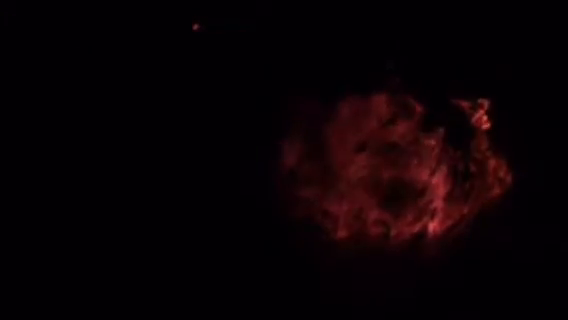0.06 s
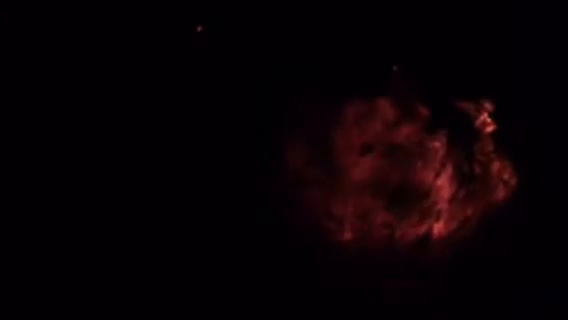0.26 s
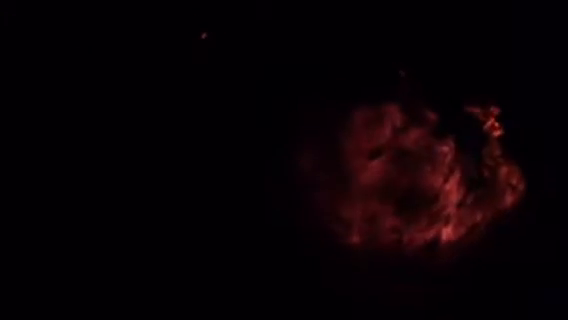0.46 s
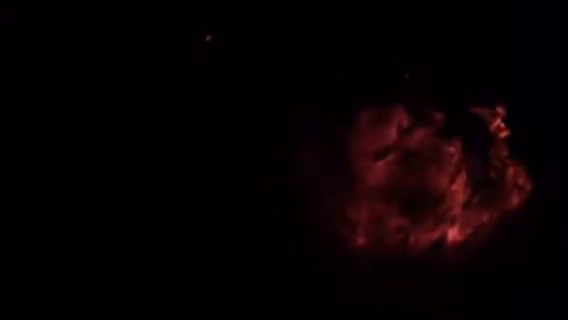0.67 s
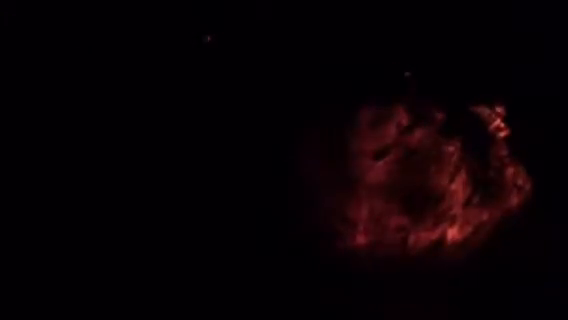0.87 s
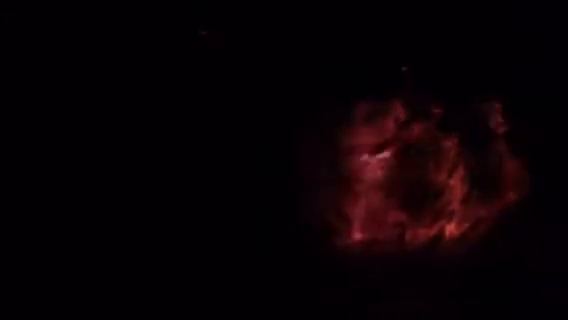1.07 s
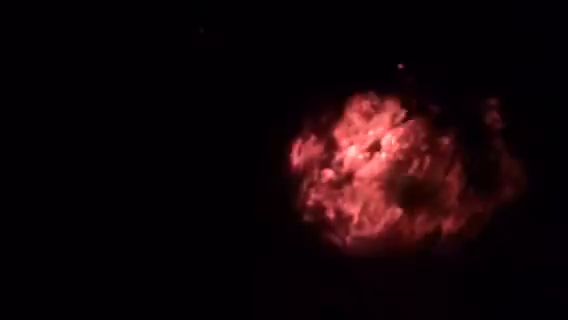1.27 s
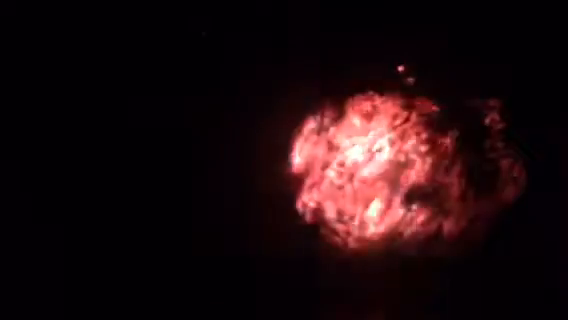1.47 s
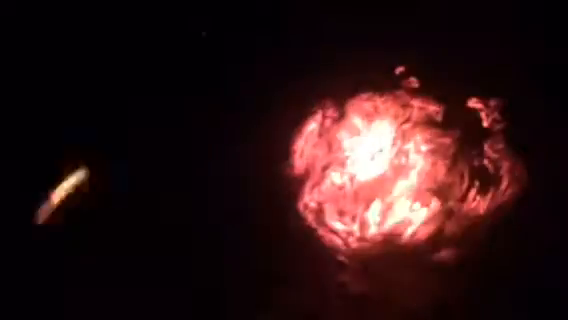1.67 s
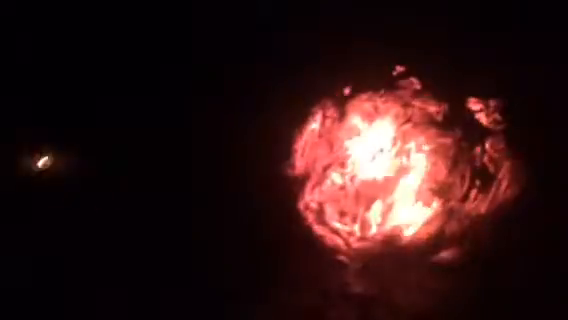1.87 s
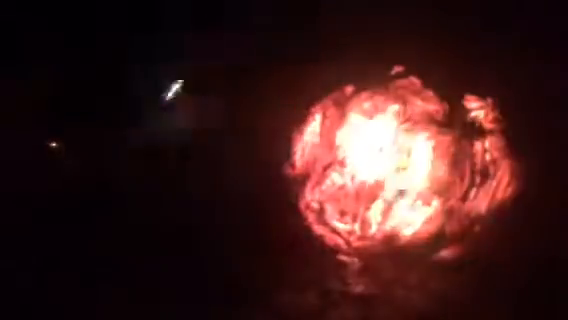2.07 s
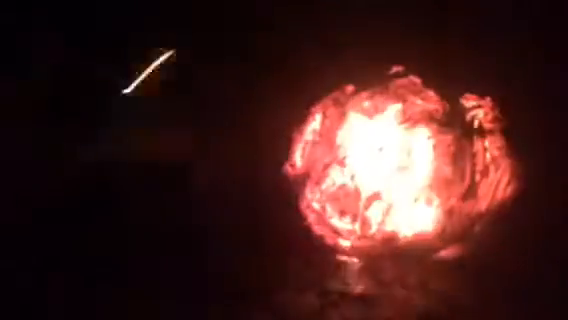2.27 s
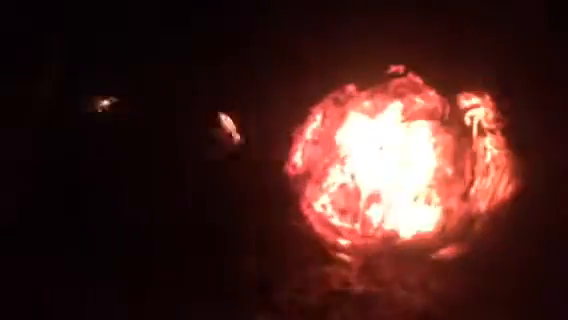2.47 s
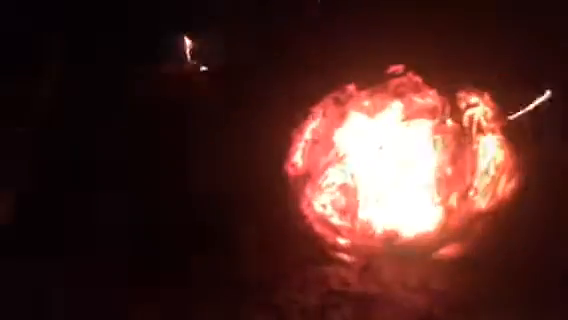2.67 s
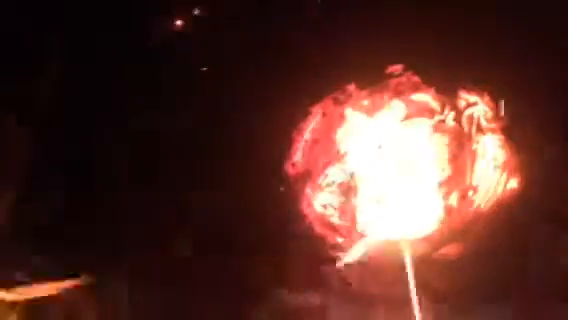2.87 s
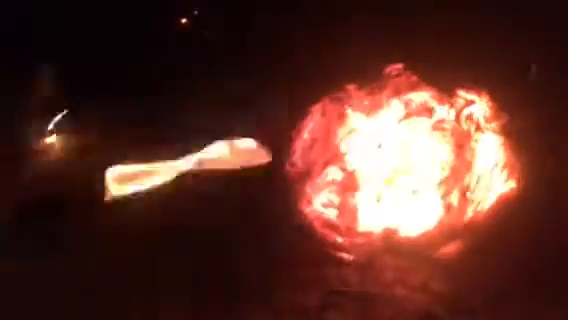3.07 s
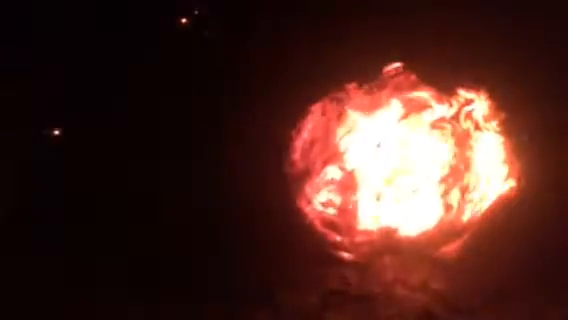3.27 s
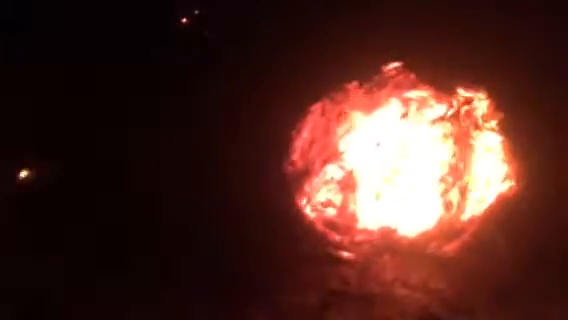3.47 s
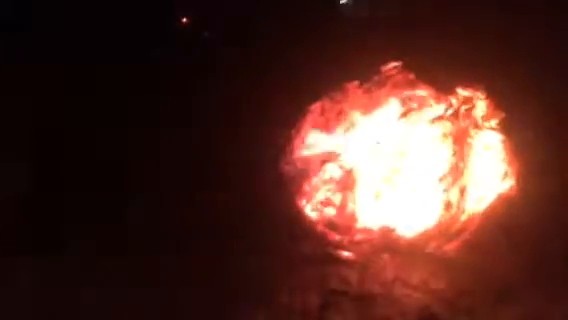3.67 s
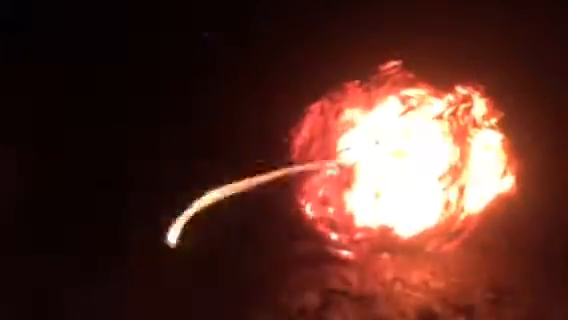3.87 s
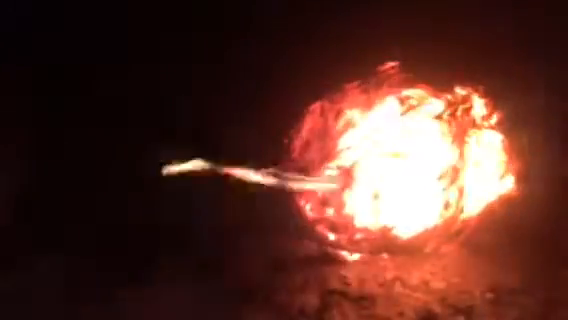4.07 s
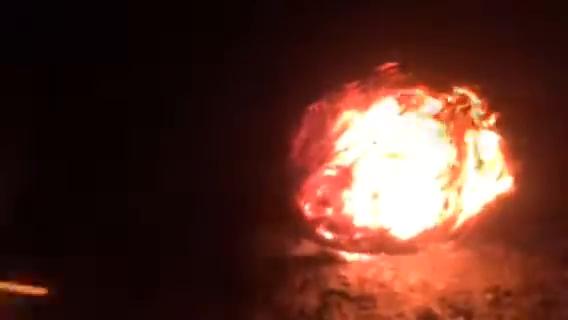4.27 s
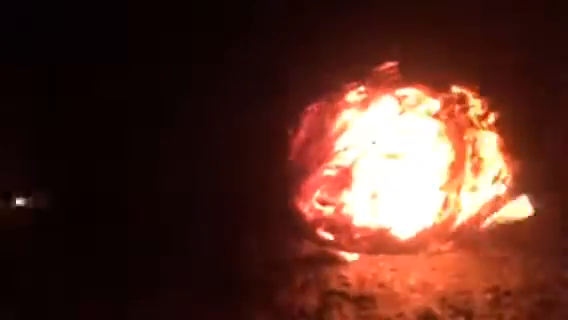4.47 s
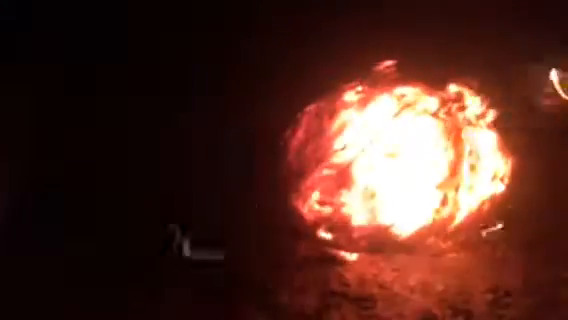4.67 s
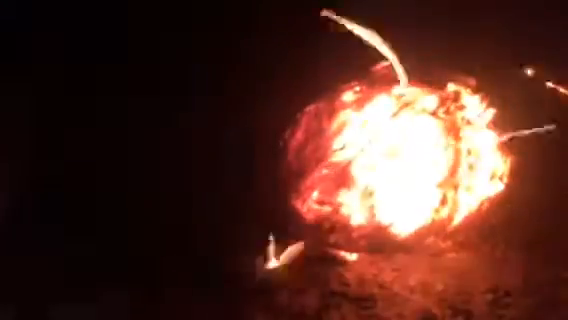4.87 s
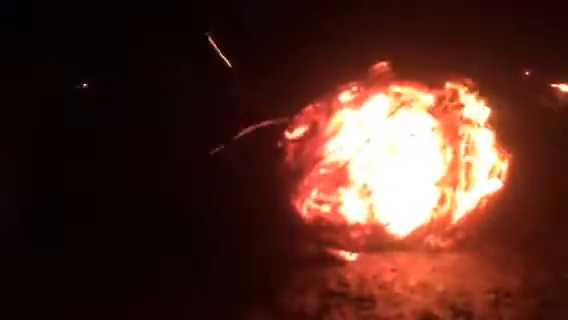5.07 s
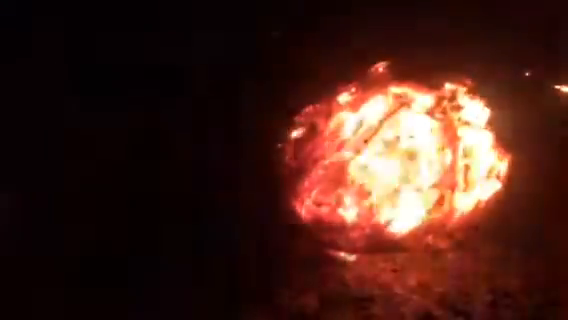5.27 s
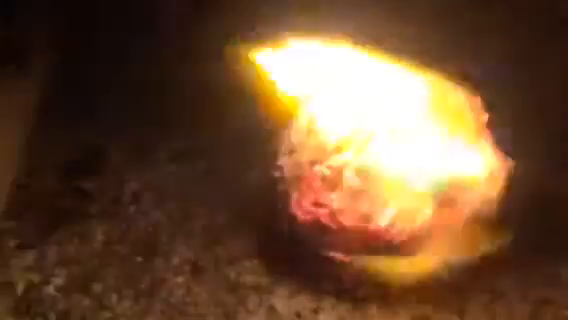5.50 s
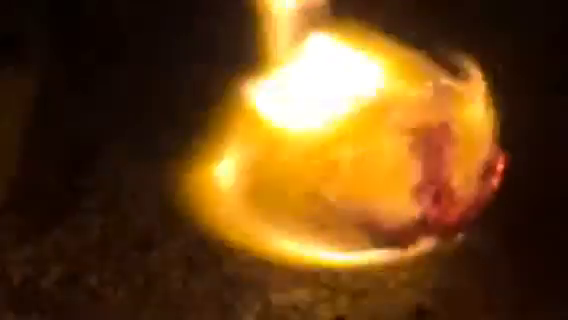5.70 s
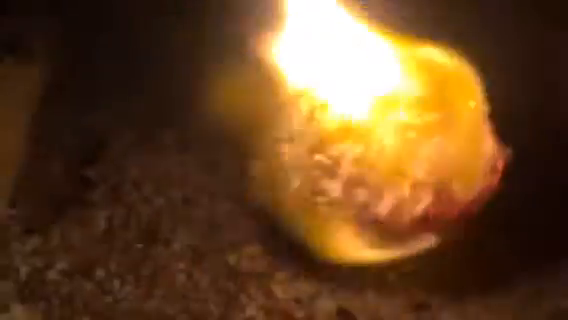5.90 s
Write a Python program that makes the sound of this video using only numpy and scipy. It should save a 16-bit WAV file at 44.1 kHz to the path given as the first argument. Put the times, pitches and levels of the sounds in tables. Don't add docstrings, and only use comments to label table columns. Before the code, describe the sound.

Wind bumps against a nearby microphone throughout, deep and uneven. Crumpled paper smoulders with faint high ticks and pings for just over a second, then burns up in a gusty, breathy rush, with papery crackling and low flame flaps growing denser. After five seconds it collapses to quiet, with bright tiny crackles and fizz. Open air, no echo.

```python
import sys
import numpy as np
from scipy import signal
from scipy.fft import rfft, irfft, next_fast_len
from scipy.io import wavfile
from scipy.ndimage import uniform_filter1d

SR = 44100
rng = np.random.default_rng(int(sys.argv[2]) if len(sys.argv) > 2 else 0)


def materialize(psi):
    bounded = np.clip(np.atleast_2d(psi).T, -1, 1)
    quanta = np.round(bounded * 32767).astype(np.int16)
    wavfile.write(sys.argv[1], SR, quanta)


def to_linear_factor(level_db):
    exponent = np.asarray(level_db, float) / 20
    return 10 ** exponent


N = 261954

# (crest time [s], peak level [dB], frequency [Hz])
EDDIES = [(0.079, -27, 121), (0.131, -23.5, 89), (0.191, -25.5, 87.5), (0.374, -27, 92), (0.548, -21.5, 86),
          (0.73, -23, 90.0), (0.935, -23, 99), (1.006, -26.5, 126), (1.303, -26.5, 144.0), (1.413, -24, 83),
          (1.501, -23.5, 127.0), (1.571, -20.5, 88), (1.608, -19.5, 106), (1.903, -21, 117.0),
          (1.966, -26, 99.0), (2.01, -20.5, 79.5), (2.092, -28, 69), (2.129, -24.5, 68.0),
          (2.281, -20.5, 151), (2.328, -22, 112), (2.508, -20.2, 84.5), (2.585, -21.5, 135),
          (2.648, -19, 126.0), (2.691, -23, 88.6), (2.787, -19, 151), (2.918, -19, 158), (2.966, -22, 183),
          (3.087, -20, 198.0), (3.24, -25, 95), (3.321, -23, 103.0), (3.411, -21, 146.0), (3.456, -23, 150),
          (3.545, -17, 158), (3.727, -17.5, 145), (3.855, -18, 128), (3.929, -20, 170), (3.966, -19, 134),
          (4.016, -20.5, 116.0), (4.051, -28, 130), (4.132, -24, 122.0), (4.17, -17, 120),
          (4.429, -25, 117.0), (4.478, -19.5, 116.0), (4.554, -16, 179.0), (4.596, -23.5, 84),
          (4.708, -20, 74), (4.85, -19.5, 116), (4.88, -27, 99), (5.04, -16, 106), (5.206, -20, 130),
          (5.271, -22, 90.0), (5.305, -18, 85), (5.343, -23, 101), (5.414, -28, 65.0), (5.448, -23, 125),
          (5.607, -21, 105), (5.645, -21.5, 106.0), (5.751, -20, 88), (5.797, -19, 84), (5.932, -21, 106)]


def curves(table):
    s, *columns = np.transpose(table)
    return [np.interp(np.arange(N) / SR, s, column) for column in columns]


def level(x, db):
    return x * to_linear_factor(db) / np.sqrt(np.mean(x ** 2))


def walk(rate):
    hold = max(int(SR / rate), 1)
    held = np.repeat(rng.standard_normal(N // 100), hold)[:N]
    slewed = uniform_filter1d(uniform_filter1d(held, hold), hold)
    return level(slewed, 0)


def bands(source, colour):
    size = next_fast_len(N)
    octave = np.log2(np.arange(1, size // 2 + 2) * SR / size)
    hz, db = np.transpose(colour)
    shaped = rfft(source, size) * to_linear_factor(np.interp(octave, np.log2(hz), db, left=-99, right=-140))
    for centre in np.arange(4, 14.5, .5):
        window = np.cos(np.pi * np.clip(octave - centre, -.5, .5)) ** 2
        yield 2 ** centre, irfft(shaped * window, size)[:N]


def grains(per_s, spread_db):
    chance = rng.random((N, 2))
    size = to_linear_factor(-spread_db * np.log(1 - chance[:, 1]))
    sign = np.sign(rng.standard_normal(N))
    return level((chance[:, 0] < per_s / SR) * size * sign, 0)


def wind():
    # (time [s], rumble level [dB])
    gusts = [(0, -39.5), (.25, -36.5), (.75, -38.5), (1.2, -41), (1.5, -37.5), (2, -34), (2.7, -34.5),
             (2.85, -33), (3, -36), (3.2, -36.5), (3.5, -32), (3.8, -36), (4.4, -31), (4.75, -34),
             (5.25, -34), (5.45, -35), (5.52, -34.5), (5.7, -37.5), (5.94, -33.5)]
    # (frequency [Hz], level per Hz [dB])
    rumble_colour = [(20, -20), (35, -17), (55, 0), (95, 4), (140, 2.5), (200, -6), (300, -14.5),
                     (450, -22), (800, -99)]
    even_share, yield_db = 0.15, -3
    t = np.arange(N) / SR
    rumble_db, = curves(gusts)
    deep_db = -44.5 + 0.4 * t - 1.5 * walk(6.14)
    lumps, out = walk(30), 0
    for hz, band in bands(rng.standard_normal(N), rumble_colour):
        deep = (deep_db - rumble_db + 9.0) * (hz < 60)
        out = out + band * to_linear_factor(deep + 1.4 * lumps + 0.61 * walk(22))
    out = level(out, 0) * to_linear_factor(rumble_db)

    swell = uniform_filter1d(uniform_filter1d(out ** 2, size=400), size=400) / to_linear_factor(2 * rumble_db)
    out = out / (swell + 0.12) ** (even_share / 2)
    under_thump = sum(np.exp(-((t - s) * hz / 0.63) ** 2) for s, _, hz in EDDIES)
    return out * to_linear_factor(1.17 + yield_db * np.minimum(under_thump, 1))


def brightness(roar_db):
    # (crest time [s], rush [dB], hiss [dB], half length [s])
    fits = [(.1, 0, -11, 0.23), (0.463, 1.5, 7.5, 0.24), (.95, -1, 3.5, 0.11), (1.252, -0.5, -7, 0.15),
            (1.4, 0, -3, 0.06), (1.51, -4, -1.5, 0.16), (1.64, 1, -2.5, 0.044), (1.9, -1, 1, 0.11),
            (1.72, -1, -1, 0.09), (2.055, -2, 0.5, 0.06), (2.253, 1.5, 2.5, 0.085), (2.602, -1, 1.5, 0.12),
            (3.0, 0.5, 0.5, 0.091), (3.6, 1, 0.5, 0.11), (3.997, 2, 1, 0.088), (4.395, 2, 1.5, 0.19),
            (4.7, -1.5, 1.5, 0.15), (5.1, 0, 1.5, 0.11), (5.377, -5, 1.5, 0.031), (5.56, -0.5, 5, 0.067),
            (5.75, 2, 10, 0.11), (5.92, 6, 14, 0.053)]
    full_roar_db = -35
    body_growth, rush_growth, hiss_growth = 0.13, 0.15, 0.33
    t = np.arange(N) / SR
    growth = [body_growth, 0, rush_growth, hiss_growth]
    tilts_db = np.outer(growth, np.minimum(roar_db - full_roar_db, 0))
    for s, rush_db, hiss_db, half in fits:
        fit = np.exp(-((t - s) / half) ** 2)
        tilts_db = tilts_db + np.outer([0, 0, rush_db, hiss_db], fit)
    return tilts_db


def flares():
    # (time [s], swell, negative for a dip
    # [dB])
    pockets = [(1.379, 1), (1.429, 7), (1.457, 5), (1.644, 6), (1.666, 3), (1.688, 2), (1.738, 3),
               (1.769, 4), (1.817, -1), (1.96, 3.7), (2.061, 3), (2.152, 0), (2.191, 3), (2.254, 4),
               (2.277, 6.5), (2.497, -2), (2.536, 5), (2.558, 4), (2.639, 3), (2.669, 7), (2.694, 5.5),
               (2.719, 4), (2.78, -1), (2.858, 2), (2.932, -2), (2.974, 2.5), (3.078, 3.7), (3.115, 6),
               (3.242, 5), (3.261, 7.5), (3.307, 4), (3.458, 1), (3.503, 5.5), (3.527, -1), (3.611, 2.3),
               (3.779, 2), (3.82, 4), (3.851, 2.7), (3.924, 5), (3.951, 3), (3.971, 3.5), (4.082, -1.5),
               (4.215, 3), (4.288, 2), (4.348, 0), (4.383, 3), (4.46, 2.2), (4.505, 3), (4.529, 1),
               (4.588, 2), (4.646, -3), (4.718, 1), (4.766, 4), (4.897, 3), (4.997, -2), (5.104, 5),
               (5.198, 2), (5.254, 3), (5.296, 0), (5.397, 5)]
    last_pop = (5.363, 8)  # s, dB
    rise_s = 0.0066
    out, age = np.zeros(N + SR), np.arange(3000) / SR / rise_s
    for s, swell_db in [*pockets, last_pop]:
        at = int(s * SR)
        out[at:at + len(age)] += swell_db * age * np.exp(1 - age)
    return out[:N]


def embers():
    # (time [s], roar level [dB])
    draught = [(0, -49), (1.15, -48), (1.3, -45.5), (1.4, -43.5), (1.5, -43), (1.58, -41), (1.65, -38.5),
               (1.82, -40.5), (2.04, -41), (2.18, -37.5), (2.45, -37.5), (3.05, -34.5), (3.3, -35),
               (3.75, -35), (4.3, -33), (4.7, -34.5), (5.0, -33), (5.22, -36.5), (5.33, -38), (5.42, -41.5),
               (5.5, -47), (5.94, -48)]
    # (frequency [Hz], level per Hz [dB])
    roar_colour = [(150, -5.5), (260, -8), (400, -11), (930, -14), (1880, -24), (2640, -30), (3170, -30.5),
                   (4570, -41), (6500, -44), (8500, -48), (10800, -49), (12600, -48.5), (14000, -51.5),
                   (15300, -57)]
    roar_db, = curves(draught)
    tilts_db = brightness(roar_db)
    gas, sparks = rng.standard_normal(N), grains(per_s=2500, spread_db=2.1)

    flutter = 0.48 * walk(110) + 0.64 * walk(200) + flares()
    flutter = flutter - uniform_filter1d(flutter, size=SR // 20)
    out = 0
    for (hz, rush), (_, fizz) in zip(bands(gas, roar_colour), bands(sparks, roar_colour)):
        reach = np.clip(np.log2(hz / 220) / 2.4, 0.25, 1) * (.65 if hz > 5000 else 1)
        place = np.interp(np.log(hz), np.log([480, 1000, 3000, 7200]), range(4))
        tilt_db = np.clip(1 - abs(place - np.arange(4)), 0, 1) @ tilts_db
        spark_share = np.clip(0.32 + 0.26 * hz / 12000, 0, 1)
        flicker = 0.83 * walk(130) + 1.36 * (hz < 400) * walk(9.7)
        out = out + (rush + spark_share * fizz) * to_linear_factor(tilt_db + reach * flutter + flicker)
    return level(out, 1.4) * to_linear_factor(roar_db)


def night():
    # (frequency [Hz], level per Hz [dB])
    hum_colour = [(200, -0.5), (450, -23), (850, -6.5), (1500, -14), (3300, -18), (6000, -24),
                  (8500, -34.5), (11000, -39), (15300, -41)]
    swell, hum = walk(5.4), 0
    for _, band in bands(rng.standard_normal(N), hum_colour):
        hum = hum + band * to_linear_factor(swell + 0.9 * walk(9))
    return level(hum, -59)


def puffs(cycles=0.65, gain_db=-2.0):
    out = np.zeros(N + SR)
    for (s, db, hz), turn in zip(EDDIES, rng.random((len(EDDIES), 1))):
        t = np.arange(-2, 2, hz / SR)
        thump = np.exp(-(t / cycles) ** 2) * np.sin(2 * np.pi * (t + turn))
        at = max(int((s - 2 / hz) * SR), 0)
        out[at:at + len(t)] += to_linear_factor(db + gain_db) * thump
    return out[:N]


def heaves(cycles=1.0, gain_db=-3.5):
    # (time [s], peak level [dB], frequency [Hz])
    long_eddies = [(0.114, -36, 83.4), (0.355, -44, 45.8), (0.355, -29, 84), (0.488, -29.5, 67.3),
                   (0.708, -38, 64.6), (1.333, -27, 64), (1.551, -35, 83.4), (1.769, -35, 65),
                   (2.34, -36, 72.7), (2.485, -35, 83.4), (2.498, -25, 83), (2.77, -34, 84),
                   (2.971, -28, 67.3), (3.101, -31, 67.3), (3.225, -39, 80.7), (3.306, -30, 83.4),
                   (3.514, -30, 83.4), (3.61, -32, 59), (3.702, -29, 69), (4.217, -29, 59.2),
                   (4.268, -33, 51.1), (4.419, -34, 83.4), (4.56, -36, 80.7), (4.679, -26, 78.1),
                   (4.824, -24, 56.5), (5.014, -27, 61.5), (5.244, -20, 83.4), (5.389, -21, 73.5),
                   (5.546, -23.5, 77), (5.732, -23, 67.3)]
    out = np.zeros(N + SR)
    for (s, db, hz), turn in zip(long_eddies, rng.random((len(long_eddies), 1))):
        t = np.arange(-1.5, 3.5, hz / SR)
        rock = np.exp(-(t / cycles) ** 2) * np.sin(2 * np.pi * (t + turn))
        at = max(int((s - .5 / hz) * SR), 0)
        out[at:at + len(t)] += to_linear_factor(db + gain_db) * rock
    return out[:N]


def ticks(t60=0.0012, gain_db=3.5):
    # (time [s], peak level [dB], frequency [Hz])
    snaps = [(0.1299, -67.3, 9200.0), (0.2382, -60.5, 11000.0), (0.3334, -62.9, 9600.0),
             (0.3478, -60.6, 11500.0), (0.3765, -59, 9900.0), (0.3949, -67, 10100.0), (0.4016, -62, 9800.0),
             (0.4243, -60, 11000.0), (0.435, -53.7, 10200.0), (0.4676, -55, 9200.0),
             (0.4985, -60.9, 10900.0), (0.5141, -59, 11700.0), (0.5361, -66, 10800.0),
             (0.607, -62.6, 10500.0), (0.6121, -53.8, 12000.0), (0.6731, -59.6, 10300.0),
             (0.6975, -58, 11700.0), (0.717, -62.5, 10100.0), (0.8187, -61.9, 10400.0),
             (0.8552, -62.6, 10600), (0.893, -64, 10500.0), (0.9671, -63, 10800.0), (0.971, -63.7, 9900.0),
             (1.0046, -60, 9400.0), (1.0909, -66, 10100.0), (1.1333, -65.4, 9100.0), (1.1776, -69, 11700.0),
             (1.2684, -66.7, 9900.0), (1.6348, -56.8, 10400.0), (2.2847, -54, 10400.0),
             (2.3529, -53.8, 9100.0), (2.8659, -47.0, 11500.0), (2.8897, -47.9, 9400.0),
             (3.004, -47, 9600.0), (3.0832, -53, 10200.0), (3.1994, -49, 10300.0), (3.2644, -54, 9200.0),
             (3.465, -51, 9800.0), (3.5473, -53, 9100.0), (3.6334, -49.8, 10500.0), (3.777, -50.1, 9400.0),
             (3.8415, -44, 12300.0), (4.0145, -48, 9800.0), (4.0317, -49, 10000.0), (4.1763, -57, 9400.0),
             (4.4069, -45.7, 9900.0), (4.8689, -48.4, 11700.0), (5.5282, -60.2, 9400.0),
             (5.5337, -62.1, 10800.0), (5.5619, -53, 10800.0), (5.5763, -54.6, 10200.0),
             (5.5893, -60.4, 9400.0), (5.6977, -56.5, 10900.0), (5.7194, -59, 10100.0),
             (5.7366, -55, 11300.0), (5.7688, -55.4, 10500.0), (5.8502, -56, 9300.0),
             (5.8956, -53.3, 9600.0), (5.9045, -53.0, 6000.0), (5.915, -55.0, 10300.0)]
    out, t = np.zeros(N + SR), np.arange(600) / SR
    decay = np.exp(-np.log(1000) * t / t60)
    for (s, db, hz), (low, high) in zip(snaps, rng.random((len(snaps), 2))):
        modes = [(1.2, 0.94), (1.2, 1.08 + 0.2 * high), (0.15, 0.85 - 0.2 * low)]
        ring = sum(size * np.sin(2 * np.pi * hz * ratio * t) for size, ratio in modes)
        at = int(s * SR)
        out[at:at + len(t)] += to_linear_factor(db + gain_db) * ring * decay
    return out[:N]


def pings(t60=0.012, gain_db=-6.0):
    # (time [s], peak level [dB], frequency [Hz])
    flakes = [(0.5144, -59, 13400), (0.611, -53, 13400), (0.8919, -55, 11600), (1.0364, -65, 10500),
              (1.0899, -60, 10200), (1.1324, -65, 10400), (2.8644, -45, 13600), (3.8402, -44, 12700),
              (5.5603, -54, 10100), (5.6965, -56, 12100), (5.7184, -59, 10900), (5.7354, -53, 11900),
              (5.7678, -55, 12300), (5.8654, -55, 10700)]
    out, t = np.zeros(N + SR), np.arange(900) / SR
    decay = np.exp(-np.log(1000) * t / t60)
    for s, db, hz in flakes:
        ring = np.sin(2 * np.pi * hz * t) + 0.6 * np.sin(2 * np.pi * hz * 1.04 * t)
        at = int(s * SR)
        out[at:at + len(t)] += to_linear_factor(db + gain_db) * ring * decay
    return out[:N]


def licks(cycles=0.74, gain_db=-5.0):
    # (time [s], peak level [dB], frequency [Hz])
    tongues = [(1.347, -33, 520), (1.381, -34, 272), (1.489, -30, 285), (1.538, -25, 288),
               (1.633, -27, 266), (1.669, -25, 482), (1.715, -24, 270), (1.821, -25, 526),
               (1.892, -31, 315), (1.936, -36, 269), (2.112, -23, 339), (2.192, -27, 380),
               (2.257, -15.5, 573), (2.298, -21, 650), (2.366, -42, 326), (2.482, -27, 250),
               (2.795, -27, 377), (2.932, -27, 332), (3.071, -26, 292), (3.154, -23, 417),
               (3.451, -30, 656), (3.565, -20, 350), (3.604, -25, 347), (3.66, -35, 261), (3.815, -25, 299),
               (4.077, -25, 267), (4.33, -14, 263), (4.411, -23, 270), (4.506, -16, 335), (4.549, -22, 274),
               (4.768, -37, 300), (4.857, -37, 282), (4.928, -19.5, 470), (4.96, -21, 396),
               (5.052, -18.5, 253), (5.236, -24, 259), (5.285, -24, 580), (5.3, -21, 468),
               (5.364, -31, 253)]
    out = np.zeros(N + SR)
    for s, db, hz in tongues:
        t = np.arange(-2, 2, hz / SR)
        flap = np.exp(-(t / cycles) ** 2) * np.cos(2 * np.pi * t)
        at = int(s * SR)
        out[at:at + len(t)] -= to_linear_factor(db + gain_db) * flap
    return np.roll(out, -SR // 500)[:N]


def cracks(t60=0.012, gain_db=-1.5):
    # (time [s], peak level [dB], frequency [Hz])
    folds = [(1.6934, -32.5, 902), (1.7269, -30, 991), (1.9479, -30.5, 931), (2.2808, -32, 1280),
             (2.336, -32.5, 1280), (2.4963, -26, 982), (2.6188, -32, 1070), (2.673, -33, 1200),
             (2.724, -28, 1120), (2.7847, -27, 974), (2.871, -27, 1050), (3.079, -27, 1020),
             (3.1067, -26, 1230), (3.185, -36, 961), (3.2443, -36, 1280), (3.2639, -27, 1060),
             (3.3493, -27.5, 1100), (3.3836, -34, 1080), (3.4335, -27.5, 1110), (3.463, -26, 1110),
             (3.5043, -28, 915), (3.5315, -24, 1030), (3.659, -30, 1020), (3.6754, -27.5, 934),
             (3.7763, -28, 910), (3.8376, -27, 931), (3.8565, -27, 1090), (3.8903, -26, 961),
             (3.9113, -25, 1160), (3.933, -27, 1160), (3.956, -26, 939), (4.0137, -25, 1080),
             (4.059, -30, 972), (4.0855, -27, 912), (4.1538, -29, 902), (4.185, -28, 1030),
             (4.2185, -27, 1020), (4.334, -30, 1340), (4.3676, -26, 910), (4.406, -25, 1100),
             (4.4293, -25, 966), (4.4514, -31, 991), (4.533, -26.5, 1530), (4.6508, -25, 907),
             (4.724, -27, 985), (4.748, -28, 1140), (4.7699, -25, 915), (4.8014, -27, 910),
             (4.8373, -24, 923), (4.9003, -28.5, 950), (4.9227, -29, 902), (5.1088, -28, 1180),
             (5.128, -31, 985), (5.1925, -28, 1120), (5.2574, -29, 1270)]
    # (time [s], peak level [dB], frequency [Hz])
    dry_edges = [(1.5657, -43, 2140), (1.7438, -39, 2300), (1.8226, -39, 1950), (2.284, -36, 1980),
                 (2.5231, -36, 2100), (2.564, -36, 1910), (2.6737, -35, 2690), (2.785, -38, 2030),
                 (2.979, -36, 3120), (3.0474, -36, 2010), (3.0833, -41, 2100), (3.1197, -36, 1900),
                 (3.2559, -33, 1920), (3.3357, -40, 2270), (3.4045, -34, 1910), (3.532, -35, 1920),
                 (3.632, -33, 2150), (3.7109, -38, 2330), (3.7767, -37, 1910), (3.8896, -37, 1920),
                 (3.9548, -35, 1910), (3.9757, -34, 2370), (4.0133, -31.5, 1960), (4.0616, -35, 2120),
                 (4.086, -35, 2220), (4.118, -36, 1910), (4.1533, -38, 1900), (4.206, -32, 1940),
                 (4.298, -32, 2180), (4.4053, -31, 1990), (4.4656, -32, 2360), (4.5307, -34, 1950),
                 (4.6216, -36, 2230), (4.76, -31, 1920), (4.7939, -38, 1900), (4.8508, -32, 1980),
                 (4.9036, -37, 2410), (4.972, -37, 2040), (5.0433, -40, 2000), (5.1042, -39, 1990)]
    # (time [s], peak level [dB], frequency [Hz])
    last_crack = (5.366, -26, 500)
    rows = [*folds, *dry_edges, last_crack]
    out, t = np.zeros(N + SR), np.arange(900) / SR
    envelope = np.minimum(t / 0.0012, 1) * np.exp(-np.log(1000) * t / t60)
    for (s, db, hz), noise in zip(rows, rng.standard_normal((len(rows), 900))):
        band = signal.butter(1, [hz * 1.11, hz * 1.19], "bandpass", fs=SR, output="sos")
        burst = signal.sosfilt(band, noise)
        at = int(s * SR)
        out[at:at + len(t)] += level(burst, db + gain_db) * envelope
    return out[:N]


def sizzle():
    start_s, rise_s, hz, width_hz = 5.89, 0.01, 11000, 800
    edges = [hz - width_hz / 2, hz + width_hz / 2]
    band = signal.butter(2, edges, "bandpass", fs=SR, output="sos")
    jet = signal.sosfilt(band, rng.standard_normal(N))
    return level(jet, -67) * np.clip((np.arange(N) / SR - start_s) / rise_s, 0, 1)


def scene():
    air = wind() + puffs() + heaves() + night()
    fire = embers() + licks() + sizzle()
    paper = ticks() + pings() + cracks()
    return (air + fire + paper)[None]


def low_pass(x):
    return signal.sosfilt(signal.butter(12, 15330, fs=SR, output="sos"), x)


def record(dry):
    # (frequency [Hz], width [Hz], boost [dB])
    hollows = [
        (3200, 700, 1),
        (5050, 760, 1.5),
        (6250, 500, -0.9),
        (7700, 700, 0.9),
        (8700, 500, -0.2),
        (10900, 600, -0.8),
        (12500, 1300, 0),
    ]
    size = next_fast_len(N)
    hz = np.arange(size // 2 + 1) * SR / size
    colour_db = sum(db * np.exp(-(2 * (hz - centre) / width) ** 2) for centre, width, db in hollows)
    heard = irfft(rfft(dry, size) * to_linear_factor(colour_db), size)[:, :N]
    return low_pass(heard)


dry = scene()
out = record(dry)
materialize(out)
```